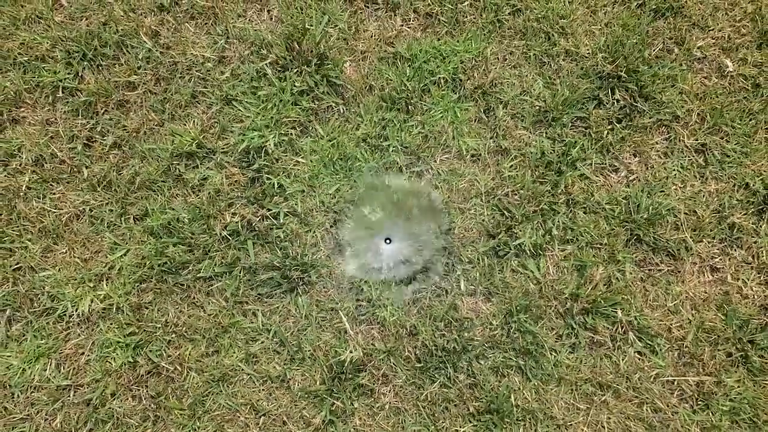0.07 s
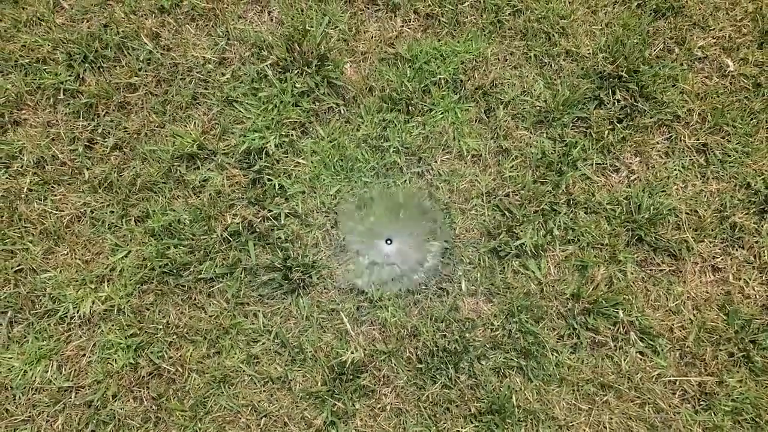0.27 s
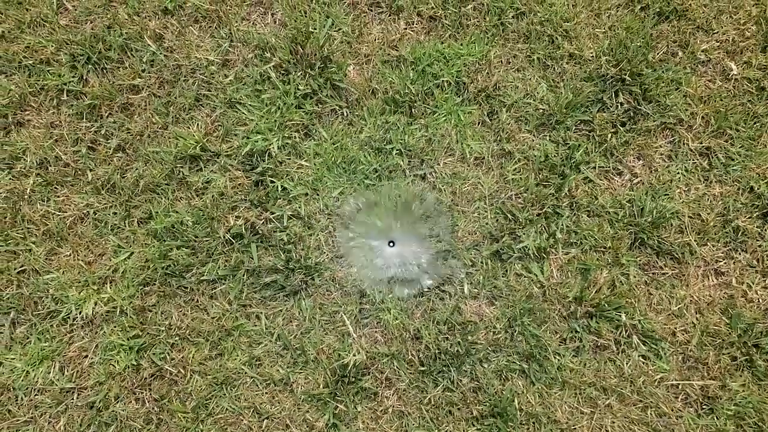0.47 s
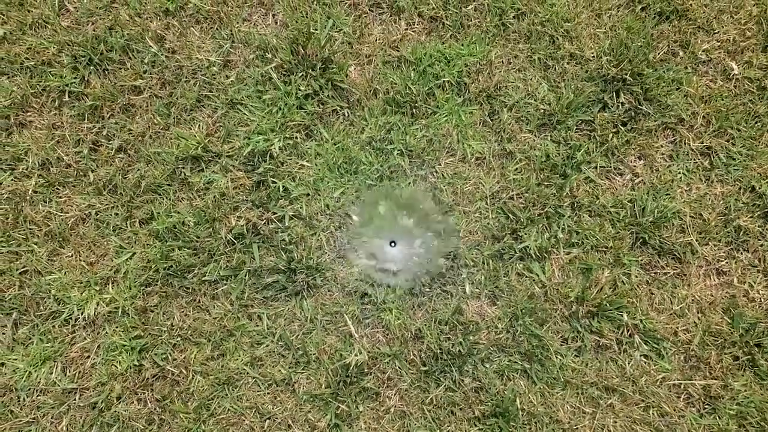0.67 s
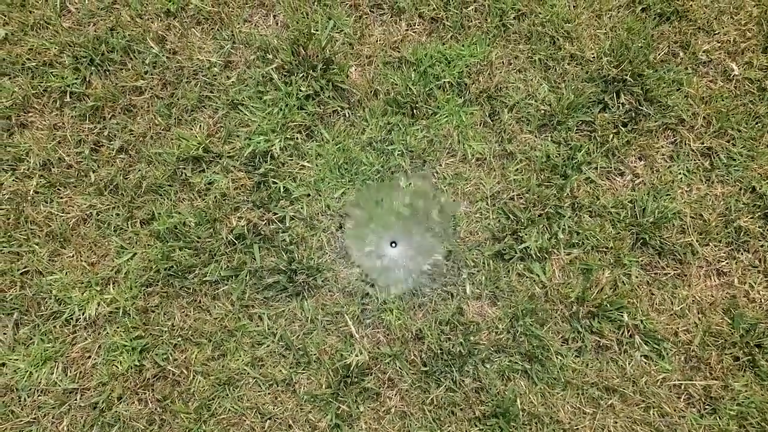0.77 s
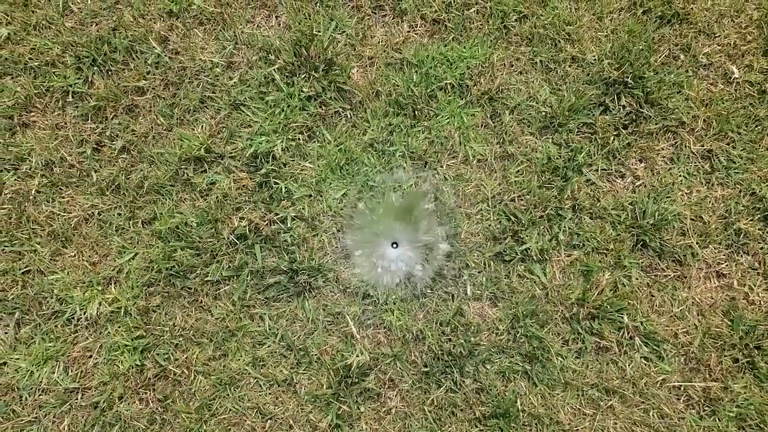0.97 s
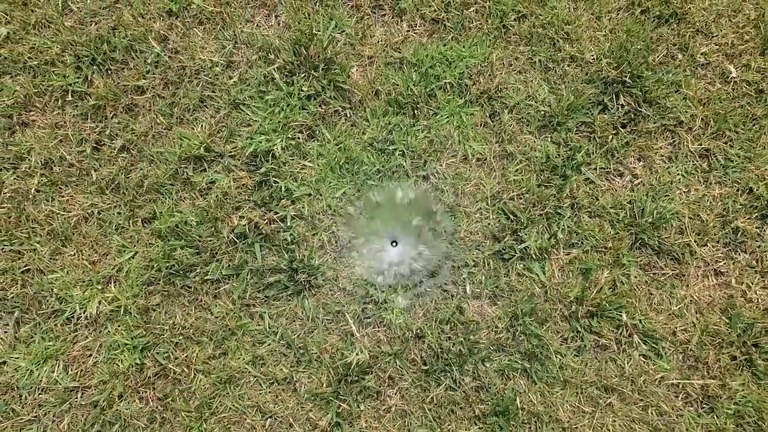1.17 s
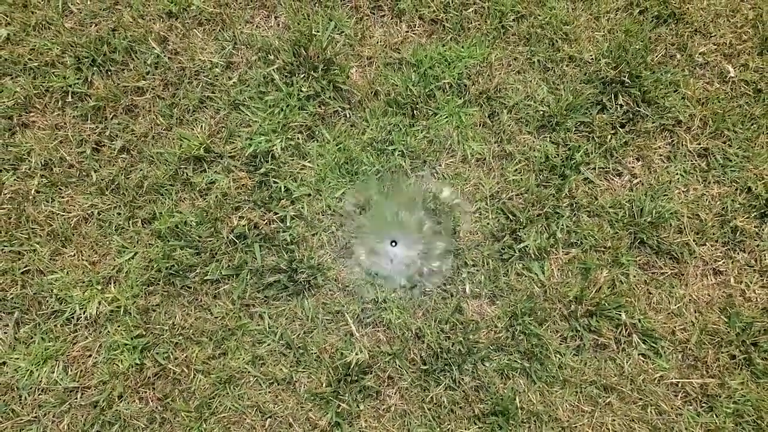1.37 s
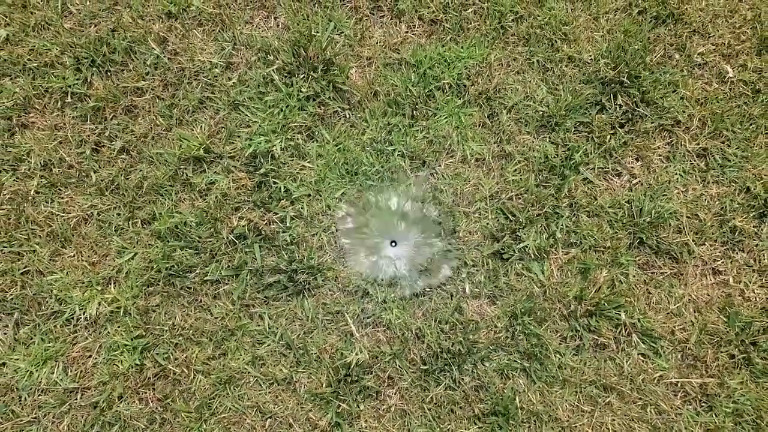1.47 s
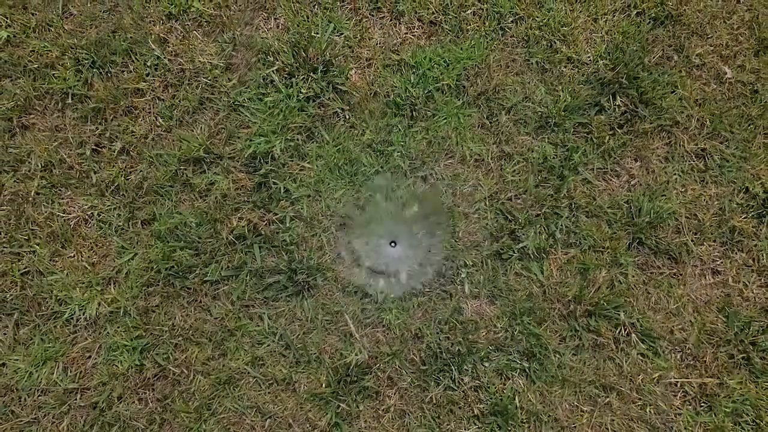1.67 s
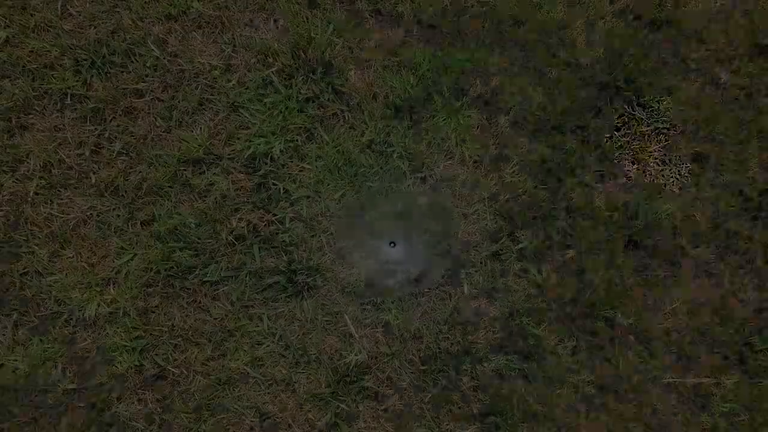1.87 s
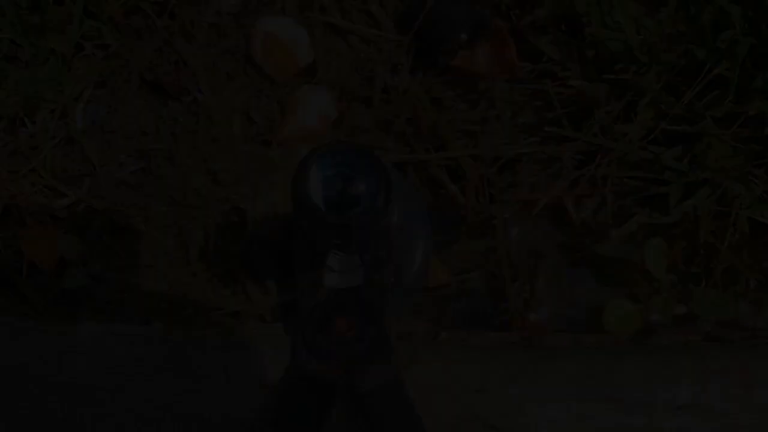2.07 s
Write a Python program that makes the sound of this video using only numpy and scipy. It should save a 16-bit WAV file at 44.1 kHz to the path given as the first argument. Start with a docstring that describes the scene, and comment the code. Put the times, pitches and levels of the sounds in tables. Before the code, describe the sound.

A pop-up sprinkler sprays a lawn with a bright, steady hiss, a few sharp spits and a soft patter of drops on grass. Light wind bumps the microphone and a distant motor hums faintly before everything fades out.

```python
"""A pop-up sprinkler sprays a lawn: its sheet of water tears into a sputtering hiss, with a few sharper
spits. Thousands of small drop impacts merge into a patter on the grass, and three large drops tick nearby.
Behind them a far motor hums in harmonics and light wind bumps the two microphone ports.
The whole sound fades out over the last second."""
import sys
import numpy as np
from scipy.fft import rfft, irfft
from scipy.io import wavfile
from scipy.ndimage import map_coordinates

SR = 44100
rng = np.random.default_rng(int(sys.argv[2]) if len(sys.argv) > 2 else 0)


def store_wav(level_fs):
    """Save 16-bit WAV to argv[1]."""
    pcm = np.round(np.clip(np.atleast_2d(level_fs), -1, 1) * 32767)
    wavfile.write(sys.argv[1], SR, pcm.T.astype(np.int16))


N = 93668
T = np.arange(N) / SR
HZ = np.fft.rfftfreq(2 * N, 1 / SR)
SURGES_PER_S = 30  # pace of the slow swings in hiss and patter

# Spectral density of the nozzle's hiss: frequency_hz, relative_db
HISS_SPECTRUM = [(1000, -31), (3300, -20), (4500, -16.5), (6000, -11.5), (7000, -19), (8000, -12.5),
                 (9500, -7), (11200, -9), (12500, 0.5), (14000, -2.5), (15700, -12.5)]
# Likeness of the spray at the two ports: frequency_hz, coherence
SPRAY_COHERENCE = [(150, .6), (400, 1), (1100, 0.82), (1700, 0.38), (2100, 0.7), (3200, 0.21), (3700, 0.7),
                   (4900, 0.83), (6500, 0.32), (6950, 0.26), (7500, 0.72), (14500, 0.86), (15700, .45)]


def nozzle_hiss():
    """Sheet breakup: the water tears in sub-millisecond bursts of noise that come in clumps."""
    # Strength of the spray: time_s, relative_db
    strength = [(0, -34), (.04, -36), (.075, -37.5), (.11, -33.5), (.16, -36), (.48, -34.5), (.62, -36.5),
                (.665, -34), (.72, -38.5), (.78, -35.5), (.84, -36), (.885, -33.5), (1.0, -35),
                (1.04, -35.2), (1.1, -34.5)]
    tear_db = 3.5 * wobble(2200)
    sputter_db = 0.94 * wobble(220)
    surge_db = 0.93 * wobble(SURGES_PER_S)
    bursts = amp(tear_db + sputter_db + surge_db) * rng.standard_normal((2, N))
    return amp(curve(strength) + 3) * spread(bursts, HISS_SPECTRUM, SPRAY_COHERENCE)


def nozzle_spits():
    """Impulse response: each spit is a single snap with the spectrum of the hiss."""
    # Sharper spits of the nozzle: start_s, peak_db
    spits = [(.048, -15), (.098, -18), (0.195, -7), (0.27, -24), (.372, -23), (0.584, -16), (0.661, -18.5),
             (0.664, -17.5), (0.772, -20.5), (.788, -14.5), (0.864, -21), (0.8917, -13), (.988, -13.5),
             (1.160, -21.5)]
    impulses = np.zeros(N)
    for start_s, peak_db in spits:
        impulses[round(start_s * SR)] = amp(peak_db)
    response = minimum_phase(HISS_SPECTRUM)
    return filtered(impulses, response) / np.abs(irfft(response)).max()


def grass_patter():
    """Shot noise: independent drop impacts of random strength overlap into a soft patter."""
    # Spectral density of drops landing on grass: frequency_hz, relative_db
    spectrum = [(100, -14.5), (250, -6), (400, -1.5), (750, -1), (1100, -3), (1600, -7), (2100, -4.5),
                (2600, -6.5), (3300, -17), (6000, -17.5), (15000, -32.5)]
    drops_per_s, scatter_db = 6000, 4
    landings = rng.random((2, N)) < drops_per_s / SR
    polarity = np.sign(rng.standard_normal((2, N)))
    impacts = landings * polarity * amp(scatter_db * rng.standard_normal((2, N)))
    level_db = -41.5 + 0.97 * wobble(SURGES_PER_S)
    return amp(level_db) * spread(impacts, spectrum, SPRAY_COHERENCE)


def drop_ticks():
    """Damped oscillation: each large drop rings for a few cycles."""
    # Large drops nearby: start_s, peak_db, pitch_hz
    drops = [(.4122, -28.5, 8800), (.8264, -25.5, 5820), (0.8305, -31.5, 5600)]
    rise_s = .0003
    ticks = np.zeros(N)
    for start_s, peak_db, pitch_hz in drops:
        age = np.maximum(T - start_s, 0)
        envelope = age / rise_s * np.exp(1 - age / rise_s)
        ticks += amp(peak_db) * envelope * np.sin(2 * np.pi * pitch_hz * age)
    return ticks


def motor_hum():
    """Harmonic series: a far motor hums at whole multiples of one slightly wavering fundamental."""
    # Partials of the hum: harmonic_number, relative_db
    harmonics = [(1, -1), (2, -7.5), (3, -15.5), (4, -19), (5, -15.5)]
    # Strength of the hum: time_s, level_db
    strength = [(0, -46.5), (.14, -42), (.38, -40), (.55, -47), (.95, -50), (1.25, -52.5), (1.5, -44),
                (1.65, -42), (1.78, -45), (2.05, -41.5)]
    fundamental_hz = 79.38 + 0.406 * wobble(5.98)
    phase = 2 * np.pi * np.cumsum(fundamental_hz) / SR
    hum = np.zeros(N)
    for number, relative_db in harmonics:
        gain = amp(relative_db + wobble(12))  # each partial swells by about 1 dB
        hum += gain * np.sin(number * phase + 2 * np.pi * rng.random())
    return np.sqrt(2) * amp(curve(strength)) * hum


def wind_rumble():
    """Incoherent pressure fluctuations: wind makes a lumpy rumble, mostly different at each port."""
    # Strength of the rumble: time_s, level_db
    strength = [(0, -39), (.075, -46), (.16, -39), (.24, -44), (.41, -38), (.53, -46), (.63, -38),
                (.70, -44), (.79, -47), (.84, -40), (.92, -41), (.96, -50), (1.08, -47), (1.18, -40),
                (1.3, -44), (1.5, -44), (2.05, -43)]
    # Spectral density of the rumble: frequency_hz, relative_db
    spectrum = [(10, -19), (25, -9.5), (50, -0.5), (75, -3), (110, -4), (180, -11), (300, -27),
                (1000, -55.5), (4000, -100)]
    # Likeness of the wind at the two ports: frequency_hz, coherence
    coherence = [(25, .03), (100, .05)]
    lumps_db = 2 * np.array([wobble(25), wobble(25)])
    pressure = amp(lumps_db) * rng.standard_normal((2, N))
    return amp(curve(strength)) * spread(pressure, spectrum, coherence)


def wind_bumps():
    """Coherent pressure pulses: each bump of wind is a low Gaussian wave packet common to both ports."""
    # Bumps of wind: centre_s, peak_db, pitch_hz, half_length_s
    bumps = [(0.014, -35.5, 50, 0.016), (0.158, -28, 76, 0.016), (0.242, -26, 70.6, .011),
             (0.302, -32, 71, 0.019), (0.363, -31, 76, .014), (0.423, -36.5, 84, .011),
             (0.485, -28, 79, 0.0082), (0.543, -35, 70.6, 0.0056), (.591, -35.5, 68, .012),
             (.672, -32, 77.5, .011), (0.769, -32.5, 67, 0.017), (0.904, -40.5, 69.5, 0.016),
             (1.007, -31, 71, 0.0069), (1.074, -22, 75, 0.0086), (1.156, -34.5, 60, .011),
             (1.208, -37, 75, 0.0063), (1.261, -39, 60, 0.017), (1.369, -30.5, 77, 0.019)]
    pressure = np.zeros(N)
    for centre_s, peak_db, pitch_hz, half_length_s in bumps:
        offset_s = T - centre_s
        envelope = np.exp(-(offset_s / half_length_s) ** 2)
        pressure -= amp(peak_db) * envelope * np.cos(2 * np.pi * pitch_hz * offset_s)
    return pressure


def at_ports(sound):
    """Phase and level differences: sound from the lawn meets the two ports unequally."""
    # Phase by which the left port leads: frequency_hz, lead_rad
    lead = [(300, 0.5), (1400, 0.06), (2000, -0.14), (3100, -2.5), (3500, -1), (5000, 0.13), (6000, -1.93),
            (6800, -1.5), (7200, 0.7), (8000, -0.24), (10000, -2.5), (11000, -3), (12000, -6),
            (14500, -9.5), (15700, -11.5)]
    # Level at the left port minus the right: frequency_hz, difference_db
    balance = [(60, -0.41), (92, 0.0), (140, 0.0), (210, 1.0), (330, 0.0), (500, 0.0), (770, -0.53),
               (1170, 1.7), (1790, 1.8), (2740, 2.2), (4190, -0.72), (6410, 0.064), (9810, 0.28),
               (15000, 0.0)]
    half_difference = np.exp(1j * along(lead) / 2) * amp(along(balance) / 2)
    return filtered(sound, np.array([half_difference, 1 / half_difference]))


def amp(db):
    """Decibels to amplitude ratio."""
    return 10 ** (np.asarray(db) / 20)


def along(points):
    """Interpolation of (frequency_hz, value) points on a log frequency axis."""
    frequency_hz, values = np.transpose(points)
    return np.interp(np.log(HZ + 1), np.log(frequency_hz + 1), values)


def curve(points):
    """Linear interpolation of (time_s, value) points, one value per sample."""
    return np.interp(T, *np.transpose(points))


def wobble(knots_per_s):
    """Smooth random modulation: a spline through Gaussian knots."""
    return map_coordinates(rng.standard_normal(N), [T * knots_per_s + 2], mode="wrap")


def filtered(sound, response):
    """Convolution: the spectrum is multiplied by a frequency response."""
    return irfft(rfft(sound, 2 * N) * response)[..., :N]


def minimum_phase(spectrum):
    """Causal response with the gain of the (frequency_hz, gain_db) points, by folding the cepstrum."""
    cepstrum = irfft(np.log(amp(along(spectrum))))
    return np.exp(rfft(np.r_[cepstrum[0], 2 * cepstrum[1:N]], 2 * N))


def spread(pair, spectrum, coherence):
    """Partial coherence: two independent signals mix into a coloured left and right of rms 1."""
    angle = np.arccos(np.clip(along(coherence), 0, 1)) / 2
    mid, side = filtered(pair, minimum_phase(spectrum) * [np.cos(angle), np.sin(angle)])
    stereo = np.array([mid + side, mid - side])
    return stereo / np.sqrt(np.mean(stereo ** 2) + 1e-20)


def scene():
    """Superposition: the sprinkler's water sounds add to the hum and the wind."""
    water = nozzle_hiss() + nozzle_spits() + grass_patter() + drop_ticks()
    return at_ports(water) + motor_hum() + wind_rumble() + wind_bumps()


def record(dry):
    """Attenuation and band limiting: the sound fades out and loses its highest treble."""
    # Closing fade: time_s, gain_db
    fade = [(1.09, 0.5), (1.2, -4.5), (1.27, -5), (1.3, -9), (1.38, -8.5), (1.5, -13.5), (1.6, -16.5),
            (1.64, -18.5), (1.72, -21.5), (1.8, -25), (1.9, -31), (2, -39.5), (2.045, -44), (2.058, -83)]
    cutoff_hz = 15850
    return filtered(dry * amp(curve(fade)), HZ < cutoff_hz)


dry = scene()
out = record(dry)
store_wav(out)
```